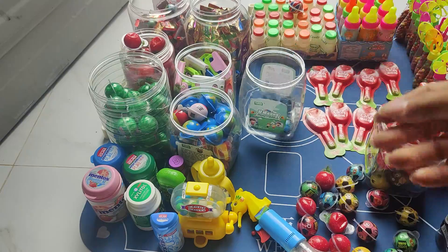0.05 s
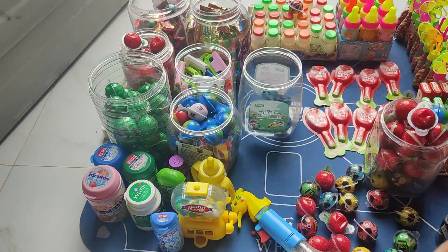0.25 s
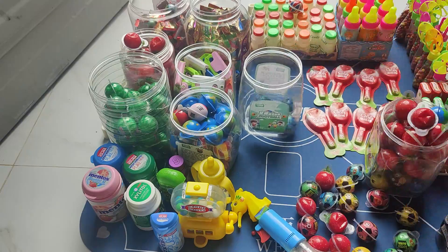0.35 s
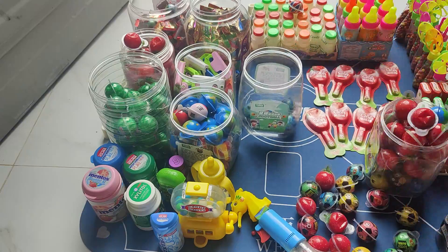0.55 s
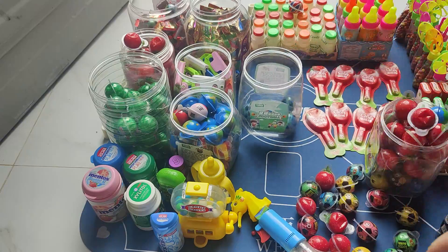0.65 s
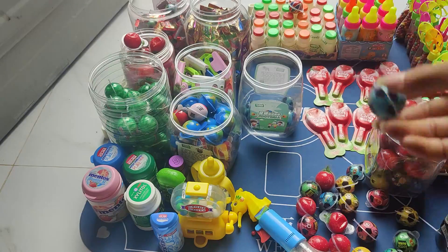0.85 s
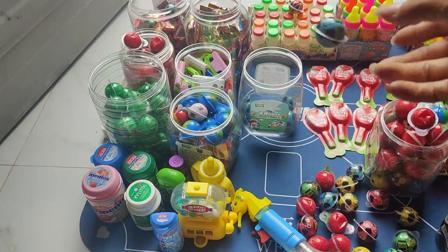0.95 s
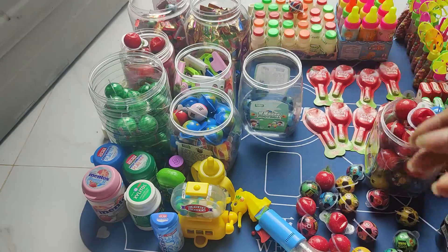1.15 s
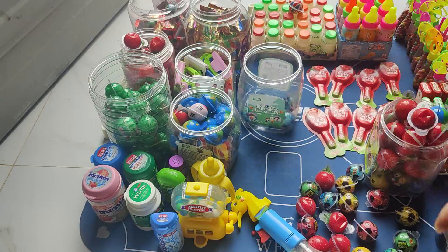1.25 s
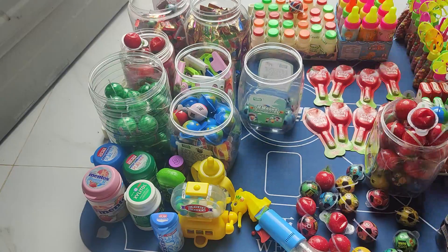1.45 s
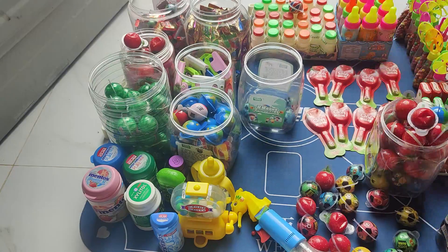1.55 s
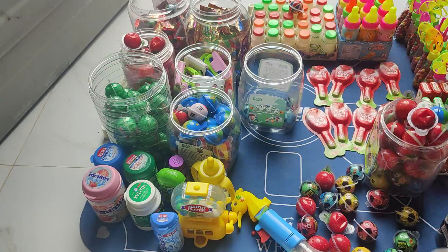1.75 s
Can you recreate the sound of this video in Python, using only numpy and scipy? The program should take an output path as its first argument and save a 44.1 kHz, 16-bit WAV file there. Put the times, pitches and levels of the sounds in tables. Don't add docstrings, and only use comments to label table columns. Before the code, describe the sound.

Two candies tossed into a plastic jar, slightly right of centre: a sharp boomy clack with shrinking rebounds, a short near-quiet gap, then a duller tumbling cluster. Close microphones, lively tiled room, faint rumble and hiss.

```python
import sys
import numpy as np
from scipy import signal
from scipy.fft import rfft, irfft
from scipy.io import wavfile

SR = 44100
rng = np.random.default_rng(int(sys.argv[2]) if len(sys.argv) > 2 else 0)


def generate_wav(sig):
    pcm = np.round(np.clip(np.atleast_2d(sig).T, -1, 1) * 32767).astype(np.int16)
    wavfile.write(sys.argv[1], SR, pcm)


def invert_db(x):
    u = np.asarray(x, float) / 20
    return 10 ** u


N = 79380

# start in seconds, wall level in dB,
# pitch in Hz where the wall answers most, crack level in dB.
KNOCKS = [(0.209, -15, 1400, -32), (0.2297, -2.5, 1500, -22), (0.2355, -10, 1025, -41),
          (.267, -8, 1180, -53), (0.273, -19, 1910, -31), (.295, -34, 720, -61), (.319, -22, 1670, -36),
          (.40, -25, 720, -46.5), (.42, -26, 920, -47), (.44, -26.5, 650, -58), (0.4859, -19, 976, -49),
          (.581, -25.5, 910, -59), (.624, -20, 870, -44.5), (.641, -15.5, 1370, -41),
          (.668, -29.5, 760, -70), (.745, -35, 800, -89), (0.813, -51.5, 1210, -80.5),
          (.845, -57, 760, -82), (1.322, -20.5, 1500, -28), (1.334, -17.5, 760, -38),
          (1.365, -13, 1050, -46), (1.411, -24, 950, -57), (1.435, -32.5, 1600, -59),
          (1.470, -17.5, 684, -47.5), (1.508, -23.5, 977, -47), (1.549, -33, 2000, -64),
          (1.569, -27.5, 1170, -58.5), (1.587, -32, 620, -72), (1.610, -40, 895, -81),
          (1.683, -48.5, 1670, -82.5), (1.711, -43, 601, -72.5), (1.764, -51, 670, -100.5)]
# frequency in Hz, dB per Hz for most knocks, dB per Hz for the second landing.
CRACK_COLOUR = [(1190, -16.5, -13), (2500, 5, -4.5), (3500, 2, -2), (5200, -6, -2.5), (7200, 3, 3),
                (9400, -10, -9), (12000, -24.5, -15), (15500, -28.5, -20)]
SECOND_FROM_S = 1.3
SIDE_SPREAD_DB = 2.5
LEFT_RIGHT = np.array([[1], [-1]])


def rms_one(x):
    return x / np.sqrt(np.mean(x ** 2) + 1e-20)


def at_hz(points, hz, column=1):
    points = np.array(points)
    return np.interp(np.log(np.maximum(hz, 1)), np.log(points[:, 0]), points[:, column])


def coloured(x, spectrum, column=1):
    size = x.shape[-1]
    hz = np.arange(size // 2 + 1) * SR / size
    gain = invert_db(at_hz(spectrum, hz, column=column))
    return rms_one(irfft(rfft(x) * gain, size))


def share(common, separate, alike):
    return np.sqrt(alike) * common + np.sqrt(1 - alike) * separate


def band_pass(x, low_hz, high_hz):
    return signal.sosfilt(signal.butter(2, [low_hz, high_hz], "band", fs=SR, output="sos"), x)


def strikes(s, db):
    clicks = np.zeros(np.shape(db)[:-1] + (N,))
    clicks[..., (np.asarray(s) * SR).astype(int)] = invert_db(db)
    return clicks + 1e-18


def ring(clicks, hz, t60):
    r = invert_db(-60 / (max(t60, 0.003) * SR))
    w = 2 * np.pi * hz / SR
    return signal.lfilter([0, np.sin(w)], [1, -2 * r * np.cos(w), r * r], clicks)


def floor():
    # frequency in Hz, level in dB per Hz.
    tone_colour = [(20, -6), (70, 1), (140, -3), (260, -18), (800, -20.5), (3000, -31.5), (8000, -34.5),
                   (15000, -53.5)]
    # centre in Hz, width in Hz, level in dB.
    hiss_humps = [(8500, 1400, -31)]
    # frequency in Hz, left-right likeness from 0 to 1.
    likeness = [(25, .8), (60, 1), (300, 0.3), (1500, 0.2), (8000, 0.12)]
    hz = np.arange(N // 2 + 1) * SR / N
    power = invert_db(2 * at_hz(tone_colour, hz))
    for centre_hz, width_hz, db in hiss_humps:
        power = power + invert_db(2 * db) / (1 + (2 * (hz - centre_hz) / width_hz) ** 4)
    mid, side = rfft(rng.standard_normal((2, N))) * np.sqrt(power)
    alike = np.clip(at_hz(likeness, hz), 0, 1)
    both = np.sqrt(1 + alike) * mid + np.sqrt(1 - alike) * side * LEFT_RIGHT
    return invert_db(-62.5) * rms_one(irfft(both, N))


def drone():
    # time in seconds, level in dB.
    swell = [
        (0, -65),
        (0.202, -56.5),
        (.9, -72.5),
        (1.2, -65.5),
        (1.8, -69),
    ]
    centre_hz, width_hz = 125, 75
    noise = rng.standard_normal(N + SR)
    noise = band_pass(noise, centre_hz - width_hz / 2, centre_hz + width_hz / 2)[SR:]
    return rms_one(noise) * invert_db(np.interp(np.arange(N) / SR, *np.transpose(swell)))


def ticks():
    # start in seconds, level in dB, pitch in Hz, time to fall 60 dB in seconds.
    taps = [(.1725, -45.5, 1960, 0.026), (.869, -47, 1800, 0.028), (.872, -49.5, 682.4, 0.2),
            (.868, -48, 496.5, 0.28), (.872, -46, 447.3, 0.21), (.95, -53, 512, 0.24),
            (.955, -64.5, 1928, 0.043), (1.083, -65, 1818, 0.02), (1.083, -58.5, 477.8, 0.29),
            (1.12, -58, 478, 0.24), (1.159, -62.5, 496, 0.16), (1.205, -59.5, 1419, 0.044),
            (1.205, -60, 754, 0.043), (1.203, -64, 2110, 0.019), (1.255, -62.5, 2000, 0.033),
            (1.258, -64.5, 800, .04), (1.712, -36.5, 168.8, 0.18)]
    return sum(ring(strikes([s], [db]), hz, t60) for s, db, hz, t60 in taps)


def walls():
    # pitch in Hz, level in dB, time to fall 60 dB in seconds.
    wall_modes = [(673, 6, 0.028), (746, -8, 0.19), (804.6, -4.5, 0.037), (939.2, -7, 0.095),
                  (963, -11.5, 0.0063), (1024, -7, 0.052), (1237, -4.5, 0.024), (1333, -6, 0.048),
                  (1500, -6, 0.025), (1674, -3.5, .035), (1836, -6, 0.055), (2000, -11, 0.072),
                  (2149, -3.5, 0.013), (2602, -3, 0.0059)]
    level_db, luck_db = -9, 2.5
    focus_db = -13
    s, knock_db, focus_hz, _ = np.transpose(KNOCKS)
    luck, side = rng.standard_normal((2, len(s), len(wall_modes)))
    out = 0
    for k, (hz, mode_db, t60) in enumerate(wall_modes):
        hit_db = knock_db + level_db + mode_db + luck_db * luck[:, k]
        hit_db = hit_db + focus_db * np.log2(hz / focus_hz) ** 2
        hit_db = hit_db + SIDE_SPREAD_DB * side[:, k] * LEFT_RIGHT
        out = out + (-1) ** k * ring(strikes(s, hit_db), hz, t60)
    return out


def crack():
    # pitch in Hz, level in dB, time to fall 60 dB in seconds.
    candy_modes = [(3340, -15.5, 0.01), (4900, -13.5, .012), (6720, -8, 0.036), (6950, -7.5, .02),
                   (7720, -5, 0.045), (7960, -4, 0.015), (9800, -21, .02), (11800, -17.5, 0.016),
                   (15000, -23.5, .015)]
    rise_s, t60_s, level_db, luck_db = 0.0014, 0.023, 10, 3
    s, knock_db = np.array(KNOCKS)[:, 0], np.array(KNOCKS)[:, 3]
    luck, side = rng.standard_normal((2, len(s), len(candy_modes)))
    fade = signal.lfilter([1], [1, -invert_db(-60 / (t60_s * SR))], strikes(s, knock_db + level_db))
    rise = np.exp(-1 / (rise_s * SR))
    fade = signal.lfilter([1 - rise], [1, -rise], fade)

    white = rng.standard_normal((3, N))
    t = np.arange(N)
    second_landing = (t > SECOND_FROM_S * SR) & (t < 1.45 * SR)
    noise = np.where(second_landing, coloured(white, CRACK_COLOUR, column=2), coloured(white, CRACK_COLOUR))
    out = fade * share(noise[2], noise[:2], 0.28)
    for k, (hz, mode_db, t60) in enumerate(candy_modes):
        hit_db = knock_db + mode_db + luck_db * luck[:, k]
        hit_db = hit_db + SIDE_SPREAD_DB * side[:, k] * LEFT_RIGHT
        out = out + ring(strikes(s, hit_db), hz, t60)
    return out


def boom():
    # start in seconds, deep tones in dB, upper tones in dB.
    thumps = [(.2100, -17, -13.5), (0.2134, -30, -15.5), (0.229, -38.5, -12.5), (.243, -19, -42),
              (.268, -19.5, -32), (.292, -64, -19.5), (0.324, -30.5, -48), (0.485, -28.5, -31),
              (0.504, -33.5, -30), (0.623, -39, -38.5), (0.639, -39.5, -31.5), (1.32, -32.5, -26.5),
              (1.332, -29.5, -17.5), (1.346, -27, -14.5), (1.391, -21, -40), (1.421, -53.5, -24.5),
              (1.471, -29.5, -25), (1.508, -34, -28), (1.573, -33.5, -40), (1.611, -53, -32),
              (1.71, -64, -45)]
    # pitch in Hz, dB at the first landing, dB at its rebounds,
    # dB with two candies, time to fall 60 dB in seconds.
    jar_modes = [(147.8, -15.5, -21, -24, 0.63), (182.9, -10.5, -13, -9.5, 0.23),
                 (232.57, -10, -7, -19, 0.33), (292, -7, -27, -11, 0.14), (345.5, -14.5, -8, -18.5, 0.16),
                 (404.3, -10, -9.5, -16.5, 0.33), (442.8, -8.5, -7.5, -12, 0.14),
                 (487.4, -5, -4.5, 0, 0.12), (553.5, -15, -14, -16, 0.045)]
    swell_s, level_db, luck_db = 0.0018, 3.5, 3
    rebound_from_s, upper_from_hz = 0.45, 350
    s, deep_db, upper_db = np.transpose(thumps)
    luck = rng.standard_normal((len(s), len(jar_modes)))
    out = 0
    for k, (hz, land_db, rebound_db, two_db, t60) in enumerate(jar_modes):
        blow_db = deep_db if hz < upper_from_hz else upper_db
        mode_db = np.select([s < rebound_from_s, s < SECOND_FROM_S], [land_db, rebound_db], two_db)
        clicks = strikes(s, blow_db + level_db + mode_db + luck_db * luck[:, k])
        swelling = ring(clicks, hz, t60) - ring(clicks, hz, swell_s * np.log(1000))
        out = out + (-1) ** k * swelling
    return out


def slaps():
    # start in seconds, level in dB.
    jerks = [
        (.2158, -39),
        (0.2314, -1),
        (0.2347, -5.5),
        (0.6429, -20),
        (1.4719, -18.5),
    ]
    return -ring(strikes(*np.transpose(jerks)), 1050, 0.004)


def clacks():
    # start in seconds, level in dB, pitch in Hz, time to fall 60 dB in seconds.
    singing_spots = [(.2301, -35, 982, .06), (.267, -31.5, 780, 0.072), (.285, -27.5, 670, 0.043),
                     (.4855, -28, 884, 0.093), (.4855, -37.5, 1142, 0.076), (.506, -36.5, 675, .09),
                     (.624, -48, 766, .07), (.641, -32.5, 1797, 0.03), (.641, -29.5, 862, 0.039),
                     (.238, -19, 292, 0.17), (.641, -39, 2110, 0.02), (.664, -41, 722, 0.079),
                     (.742, -45, 889, .12), (.742, -47, 733, 0.15), (.742, -53, 1570, .04),
                     (.812, -54, 867, .08), (1.334, -28.5, 706, 0.12), (1.365, -31, 885, 0.066),
                     (1.47, -24, 656, 0.044), (1.47, -39, 740, 0.071), (1.47, -33, 447, 0.3),
                     (1.508, -27.5, 289, 0.14), (1.549, -44, 1954, 0.038), (1.569, -35, 1290, 0.033),
                     (1.569, -39, 675, 0.16), (1.585, -35, 670, .08), (1.609, -40.5, 507, 0.091),
                     (1.683, -51, 1900, 0.033), (1.683, -50.5, 1377, 0.03), (1.711, -34, 648, 0.044),
                     (1.764, -54, 645, 0.066), (1.338, -23.5, 146.2, .75), (1.33, -18.5, 233.5, 0.54),
                     (1.53, -31.5, 232.7, 0.49), (.63, -41.5, 233, .4), (1.3476, -17, 486.4, 0.11),
                     (.2301, -25, 710, 0.03), (.267, -32, 970, 0.056), (1.408, -39, 1900, 0.032),
                     (1.432, -35, 1790, 0.027)]
    differ_hz = 700
    side = rng.standard_normal(len(singing_spots))
    out = 0
    for (s, db, hz, t60), lean in zip(singing_spots, side):
        side_db = SIDE_SPREAD_DB * min(hz / differ_hz, 1) * lean * LEFT_RIGHT
        out = out + ring(strikes([s], db + side_db), hz, t60)
    return out


def room(x):
    # frequency in Hz, time to fall 60 dB in seconds, level in dB, left-right likeness from 0 to 1.
    echo_bands = [(120, 0.16, -8, 0.88), (200, 0.78, -7.5, 1), (420, 0.67, -7.5, 0.73),
                  (800, 0.47, -1, 0.22), (2000, 0.4, -0.5, 0.033), (4840, 0.48, 3, 0.12),
                  (10000, 0.15, -8, 0.14), (15000, 0.34, 3, 0.052)]
    onset_s = 0.016
    t = np.arange(SR) / SR
    tail = 0
    for low_hz in 70 * 2.0 ** np.arange(8):
        band = band_pass(rng.standard_normal((3, SR)), low_hz, 2 * low_hz)
        t60, level_db, alike = [at_hz(echo_bands, low_hz * 2 ** 0.5, column=c) for c in (1, 2, 3)]
        band = share(band[2], band[:2], np.clip(alike, 0, 1))
        tail = tail + band * invert_db(level_db - 60 * t / t60) / np.sqrt(t60 * SR / np.log(1e6))
    tail = tail * (1 - np.exp(-(t / onset_s) ** 2))
    return signal.fftconvolve(x[None], tail)[:, :N]


def rustle():
    # time in seconds, level in dB.
    hand = [
        (0.798, -85.5),
        (0.871, -77),
        (0.969, -70.5),
        (1.0, -99),
        (1.8, -87),
    ]
    grains_per_s = 1300
    grains = rng.standard_normal((2, N)) * (rng.random((2, N)) < grains_per_s / SR)
    return coloured(grains, CRACK_COLOUR) * invert_db(np.interp(np.arange(N) / SR, *np.transpose(hand)))


def scene():
    # frequency in Hz, level in dB.
    left_shade = [(100, 0), (300, -4), (1000, -3), (4000, -0.5), (8000, -5), (12000, -5)]
    left_lag = 4
    jar = ticks() + walls() + crack() + boom() + slaps() + clacks()
    jar = signal.sosfilt(signal.butter(2, 121, "high", fs=SR, output="sos"), jar)
    left, right = jar + room(jar.mean(axis=0))
    hz = np.arange(N // 2 + 1) * SR / N
    delay = np.exp(-2j * np.pi * hz * left_lag / SR)
    left = irfft(rfft(left) * invert_db(at_hz(left_shade, hz)) * delay, N)
    background = (floor() + drone()) * invert_db([[-2.5], [0]])
    return np.array([left, right]) + background + rustle()


def top_cut(x):
    return signal.sosfilt(signal.butter(12, 16150, fs=SR, output="sos"), x)


def record(dry):
    mix = signal.sosfilt(signal.cheby2(12, 70, 16000, fs=SR, output="sos"), dry)
    return top_cut(mix)


dry = scene()
out = record(dry)
generate_wav(out)
```